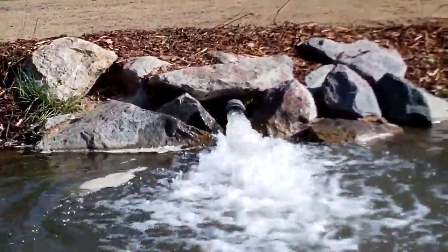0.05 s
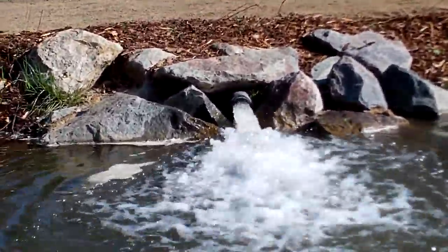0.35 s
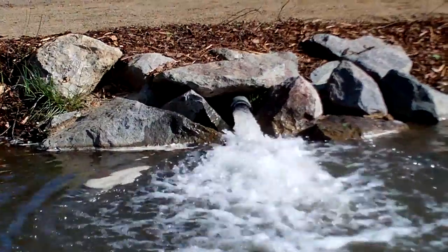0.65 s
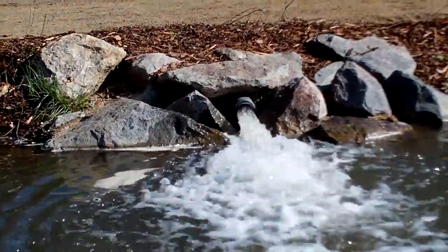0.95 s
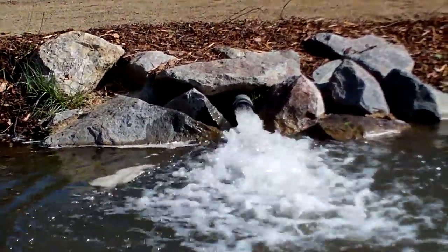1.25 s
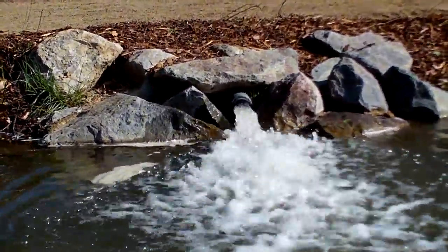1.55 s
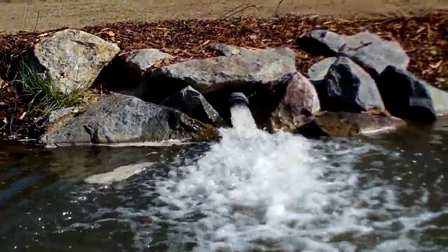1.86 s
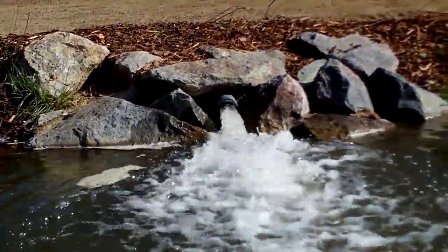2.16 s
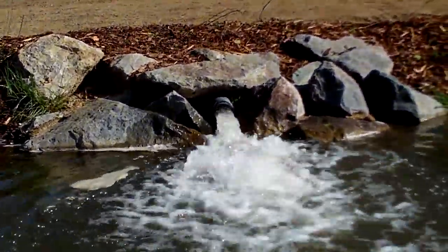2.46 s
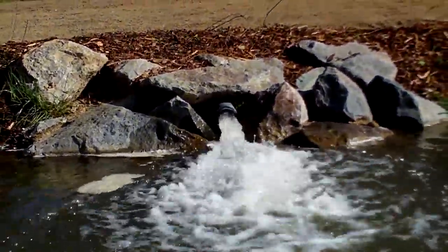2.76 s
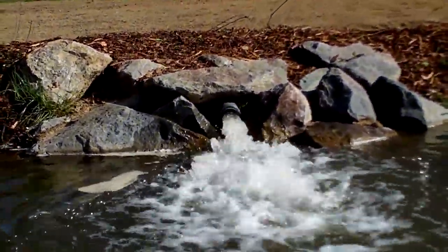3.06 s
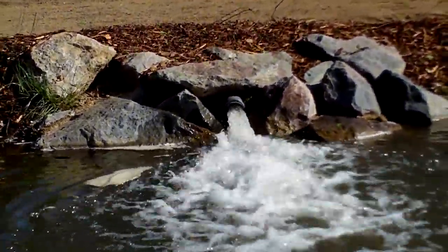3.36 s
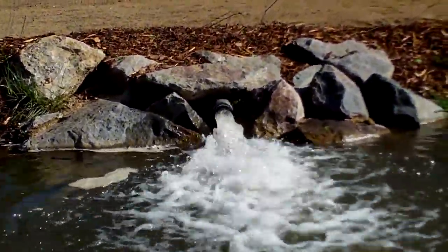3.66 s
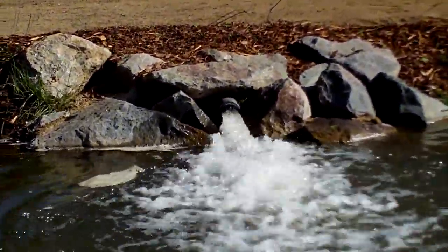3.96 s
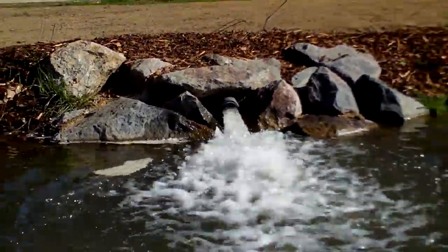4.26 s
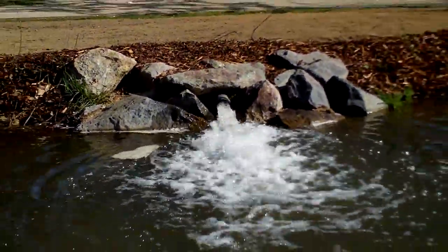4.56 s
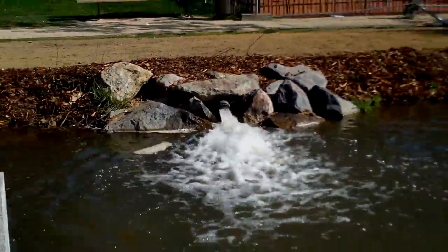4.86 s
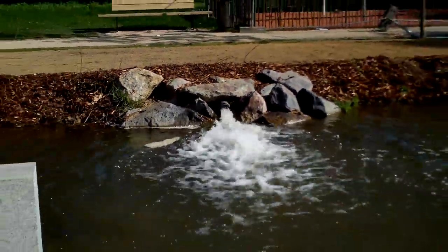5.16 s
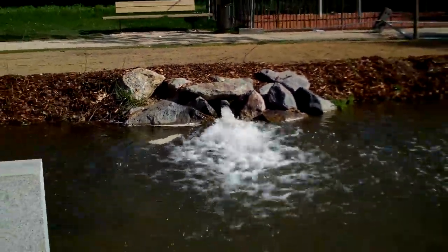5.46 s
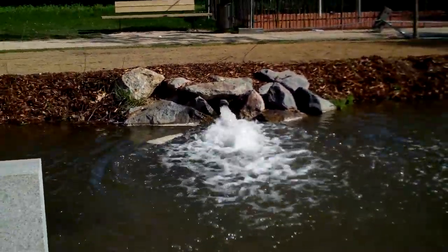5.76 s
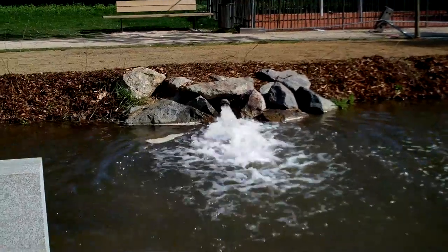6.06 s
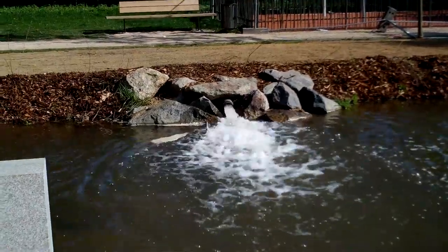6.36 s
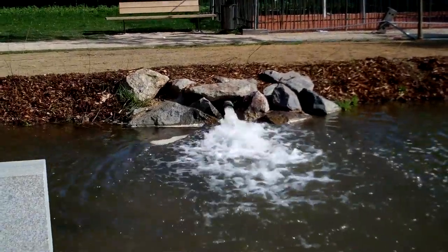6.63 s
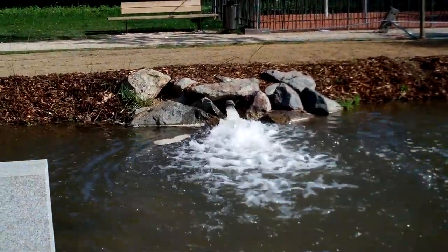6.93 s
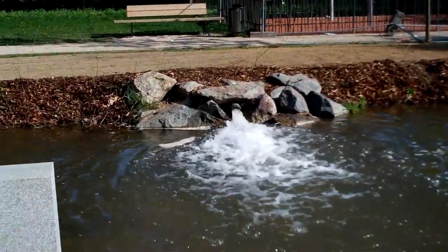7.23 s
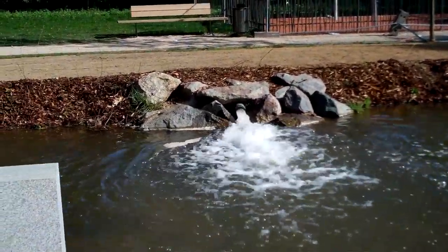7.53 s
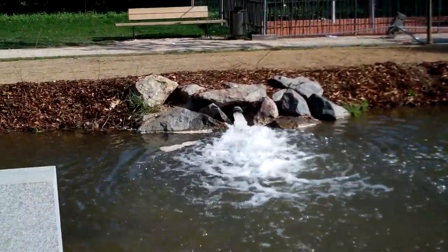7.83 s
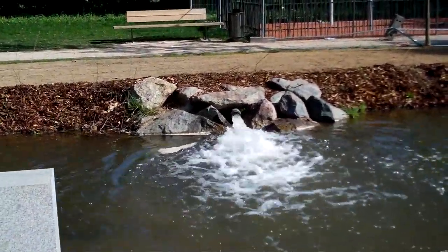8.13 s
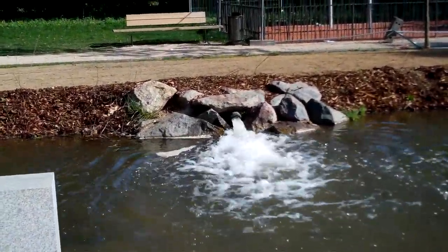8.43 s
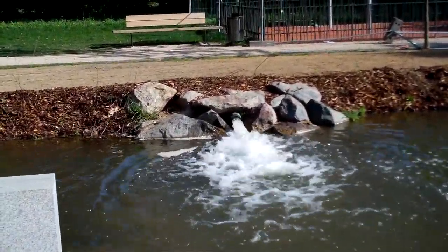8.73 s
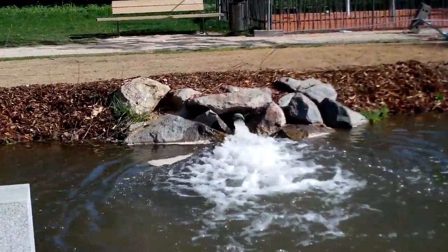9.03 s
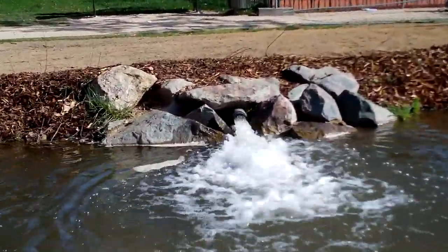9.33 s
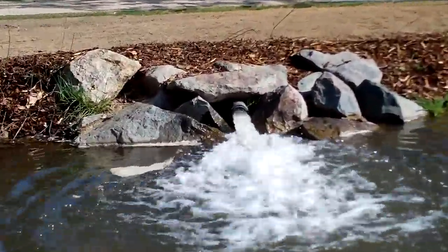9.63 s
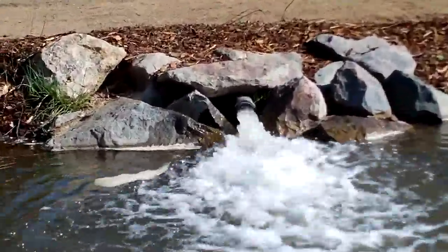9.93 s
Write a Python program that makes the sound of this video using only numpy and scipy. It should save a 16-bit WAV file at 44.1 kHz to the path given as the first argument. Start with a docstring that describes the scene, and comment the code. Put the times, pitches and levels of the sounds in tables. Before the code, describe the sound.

Outdoors on a pond bank, a hand-held camera picks up water pouring from a pipe: continuous bubbling and churning, hollow glugs and pattering spray. Scattered plastic clicks and dull handling bumps sound right at the microphone, while a far bird and a low hum barely show through. After the middle, the casing cracks sharply once; the water turns quieter, then slowly recovers as the ticking goes on.

```python
"""Glugging, gurgling water under splashing spray: a pipe gushes into a park pond and its jet drives
air under, where it rings as bubbles. Up close, the casing of a hand-held camera on the bank ticks,
rubs and bumps in the grip. A far bird and a low hum barely show through. One sharp crack of the
casing makes the gain control duck, and the water creeps back over three seconds."""
import sys
import numpy as np
from scipy import signal
from scipy.fft import rfft, irfft, next_fast_len
from scipy.io import wavfile
from scipy.ndimage import map_coordinates

SR = 44100
rng = np.random.default_rng(int(sys.argv[2]) if len(sys.argv) > 2 else 0)


def store_wav(level_fs):
    """Save 16-bit WAV to argv[1]."""
    pcm = np.round(np.clip(np.atleast_2d(level_fs), -1, 1) * 32767)
    wavfile.write(sys.argv[1], SR, pcm.T.astype(np.int16))


N = 440559
TIME = np.arange(N) / SR


def water():
    """Big bubbles boil up under the jet, small ones babble in the foam, spray patters down in bursts."""
    # tone of the plunging water: f/Hz, relative level/dB
    spectrum = [(25, -55), (70, -29.5), (170, -23), (350, -10.5), (440, -1), (560, -0.5), (730, -5),
                (1500, -7.5), (3100, -10.5), (4400, -24.5), (6100, -25.5), (9300, -32.5), (11800, -43),
                (15000, -64)]
    surge = wobble(rate=14)  # the jet lands unevenly
    churn = rng.standard_normal(N) * amp(0.14 * surge + 0.6 * wobble(rate=60))
    boil = bubbles(count=200, low_hz=425.3, high_hz=590, cycles=41, rise=0.21, spread_db=2, size=4000)
    gurgle = bubbles(count=1300, low_hz=369.2, high_hz=1162, cycles=38, rise=0.082,
                     spread_db=1.5, size=2400)
    babble = bubbles(count=7000, low_hz=908.6, high_hz=5390, cycles=49, rise=0.063,
                     spread_db=2.5, size=700)
    spray = bubbles(count=20000, low_hz=3100, high_hz=14000, cycles=8.6, rise=0.05,
                    spread_db=2, size=120)
    splash = amp(0.5 * surge + 0.44 * wobble(rate=50))
    body = churn + amp(-27) * boil + amp(-20) * gurgle
    foam = splash * (amp(-11.5) * babble + amp(-6.5) * spray)
    coloured = filtered(body + foam, lambda hz: amp(along(spectrum, hz) + port_db(hz)))
    return amp(-37 + 0.03 * wobble(rate=2.27)) * unit(coloured)


def bubbles(count, low_hz, high_hz, cycles, rise, spread_db, size):
    """Ringing bubbles, many weak and a few strong; each bends up in pitch as it nears the surface."""
    when, pitch, strength, damping = rng.random((count, 4)).T[:, :, None]
    hz = low_hz * (high_hz / low_hz) ** pitch
    t = np.arange(size) / SR
    age = t * hz / (cycles * (0.5 + damping))  # 1 = died away
    gain = amp(-spread_db * np.log(1 - 0.98 * strength)) * hz / low_hz
    bend = 1 + rise * np.minimum(age, 1) / 2
    ring = gain * amp(-60 * age) * np.sin(2 * np.pi * hz * t * bend)
    place = (when * N).astype(int) + np.arange(size)
    return unit(np.bincount(place.ravel(), ring.ravel(), N)[:N])


def port_db(hz):
    """The colour that the microphone port gives to the water."""
    # peaks and hollows of the port: f/Hz, width/Hz, level/dB
    resonances = [(724, 47, -1.5), (892, 58, 4), (1244, 60, -3.5), (1540, 110, 1.5), (1684, 72, -2.5),
                  (1884, 78, 3), (2090, 96, -1.5), (2320, 130, 2.5), (2573, 160, -3.5), (3350, 82, -1),
                  (3984, 65, 5), (6880, 410, -9), (8150, 440, -1.5)]
    return sum(db * np.exp(-((hz - centre) / width) ** 2) for centre, width, db in resonances)


def glugs():
    """A big pocket of air swells in, rings for some cycles and rises a little in pitch."""
    # the biggest pockets of air: t/s, peak level/dB, f/Hz, swell/s
    pockets = [(.088, -32, 450, 0.0062), (.15, -36, 500, .008), (.81, -39, 483, .0065),
               (.91, -38, 535, .007), (1.125, -34, 595, .0064), (1.2, -35.5, 552, .0066),
               (1.43, -38, 466, 0.017), (1.5, -37.5, 460, .008), (1.89, -38, 467, .008),
               (2.35, -35, 466, 0.013), (2.513, -35, 448, 0.0094), (2.692, -36, 445, 0.005),
               (3.24, -34.5, 580, .007), (3.813, -33, 448, .0063), (4.565, -38, 540, 0.0043),
               (4.975, -34, 455, 0.0085), (5.244, -30.5, 467, 0.0044), (5.44, -37, 456, .007),
               (5.648, -36, 537, .005), (6.115, -32.5, 518, .01), (6.285, -36, 492, 0.0076),
               (6.933, -24.5, 490, .003), (8.43, -39, 538, 0.005), (8.764, -45, 458, .006),
               (9.402, -34, 530, .005), (9.645, -37, 466, 0.0054), (9.881, -35, 565, .006)]
    track, t = np.zeros(N), np.arange(SR // 8) / SR
    for s, db, hz, swell in pockets:
        age = t / swell  # 1 = loudest
        envelope = amp(db) * age * np.exp(1 - age)
        add(track, s, envelope * np.sin(2 * np.pi * hz * t * (1 + 0.0072 * age)))
    return track


def casing():
    """The shell of the camera ticks in the grip, and fingers rub across it."""
    # ticks of the shell: t/s, level/dB, ring f/Hz, ring t60/s, contact hardness/0-1
    ticks = [(0.3577, -23.5, 1860, .005, 0.52), (1.2456, -22, 1600, .0076, 0.26),
             (1.3945, -28, 1600, .005, .2), (1.554, -25.5, 1300, .0045, 0),
             (1.6736, -23, 1410, 0.0046, .06), (2.1772, -15, 1630, 0.0099, 0.54),
             (2.1805, -16.5, 1360, 0.012, .53), (3.0026, -17.5, 1720, 0.0069, 0.61),
             (3.7906, -31, 1560, .005, 1), (3.9069, -19, 1780, 0.0066, 0.46),
             (4.1522, -24.5, 1710, .007, .2), (4.7971, -28, 2250, .007, .2), (4.828, -27, 2000, .007, 0),
             (5.3596, -27, 1450, .005, 0), (5.757, -24, 1570, .009, 0), (5.769, -21.5, 1350, .004, .1),
             (5.812, -28, 1700, .007, .4), (5.816, -26, 1650, .009, .2), (5.8213, -18, 1320, 0.011, 0.61),
             (5.8243, -17, 1600, .012, 0.4), (5.8296, -14, 1790, .011, 0.65),
             (5.8314, -22, 1390, .0059, 0.99), (5.8324, -7.5, 1120, 0.004, 0.4),
             (5.833, -15.5, 1600, 0.018, 0.7), (7.302, -20.5, 1540, .008, 0),
             (7.561, -22.5, 1700, .007, .05), (7.712, -27, 1450, .005, 0), (7.849, -28, 1500, .005, .05),
             (7.934, -23.5, 1570, .008, .05), (7.999, -14.5, 1540, .011, 0),
             (8.1981, -38, 1350, .005, 0.94), (8.708, -23.5, 1460, 0.0055, 0),
             (8.9672, -27, 1450, .003, .15), (9.0255, -20, 1560, .013, .43), (9.0395, -29, 1600, .008, .1),
             (9.3541, -26, 2350, .006, .1), (9.9159, -16, 1460, .0037, 0.23)]
    # finger strokes: t/s, length/s, rms level/dB
    strokes = [(1.246, 0.13, -45), (5.787, 0.057, -40.5), (9.005, .095, -42)]
    track = np.zeros(N)
    for s, db, hz, t60, hardness in ticks:
        add(track, s, amp(db) * tick(hz, t60, hardness))
    for s, length, db in strokes:
        add(track, s, amp(db) * rub(length))
    # the small shell passes no bass and little top
    shell_band = signal.butter(3, [350, 12500], "band", fs=SR, output="sos")
    hollow_hz, width_hz = 7050, 470  # the port's deepest hollow also colours the ticks
    hollow = signal.iirnotch(hollow_hz, hollow_hz / width_hz, fs=SR)
    return signal.lfilter(*hollow, signal.sosfilt(shell_band, track))


def tick(hz, t60, hardness):
    """Stiff plastic slips and the finger-damped shell knocks; hard contacts crack and wake high modes."""
    # higher modes of the shell: f/Hz, level at the hardest contact/dB, t60/s
    shell_modes = [(3040, -4, .007), (3620, -.5, 0.0067), (4116, 1.5, 0.0082), (4920, -2, 0.0064),
                   (6060, -8.5, 0.006), (8370, 2.5, .0042), (11000, -5.5, .004)]
    t = np.arange(SR // 25) / SR
    knock = amp(-1.5) * mode(t, hz, t60)
    db_per_octave = 23.5 * (1 - hardness)  # a soft contact loses the highs
    detunes = 1 + 0.036 * rng.uniform(-1.1, 1, len(shell_modes))
    clack = sum(amp(db - db_per_octave * np.log2(f / 1720)) * mode(t, f * detune, decay)
                for (f, db, decay), detune in zip(shell_modes, detunes))
    crack = burst(t, low_hz=1720, high_hz=2610 + 3000 * hardness, t60=0.0089)
    return knock + clack + amp(-18.5 + 20 * hardness) * crack


def mode(t, hz, t60, attack_s=0.00029):
    """One quickly dying mode, with the energy of a millisecond at rms 1."""
    ring = np.sin(2 * np.pi * hz * t) * amp(-60 * t / t60) * (1 - np.exp(-t / attack_s))
    return ring * np.sqrt(SR / 1000 / np.sum(ring ** 2))


def burst(t, low_hz, high_hz, t60):
    """A dying puff of noise in one band, with the energy of a millisecond at rms 1."""
    band = signal.butter(3, [low_hz, high_hz], "band", fs=SR, output="sos")
    puff = signal.sosfilt(band, rng.standard_normal(len(t)) * amp(-60 * t / t60))
    return puff * np.sqrt(SR / 1000 / np.sum(puff ** 2))


def rub(length_s, slips_per_s=2500):
    """A finger drags over the shell in tiny slips."""
    progress = np.linspace(0, 1, int(length_s * SR))
    stroke = np.sqrt(progress) * (1 - progress)  # catches quickly, lets go slowly
    slips = rng.standard_normal(len(stroke)) * (rng.random(len(stroke)) < slips_per_s / SR)
    band = signal.butter(2, [1300, 3000], "band", fs=SR, output="sos")
    return unit(signal.sosfilt(band, stroke * slips))


def hand(bump_hz=200, bump_t60=0.026, bump_attack_s=0.0013):
    """A lumpy rumble that swells when the grip shifts, and dull bumps of a few heavily damped cycles."""
    # shifts of the grip: middle t/s, half length/s, rumble level/dB
    regrips = [(1.1, .2, -66), (3.5, 0.34, -64), (4.5, .25, -67.5), (7.35, 0.46, -62), (9.7, 0.52, -63.5)]
    # soft bumps of the hand: t/s, level/dB
    bumps = [(1.03, -42), (1.081, -33), (3.26, -41), (3.4, -37), (3.548, -33), (4.069, -37.5), (7.39, -38),
             (8.487, -38), (8.551, -34), (9.022, -30.5), (9.488, -34), (9.87, -33), (9.905, -28)]
    band = signal.butter(3, [95, 290], "band", fs=SR, output="sos")
    lumps = unit(signal.sosfilt(band, rng.standard_normal(N)) * amp(3.6 * wobble(rate=22)))
    resting = amp(-71.5)
    shifting = sum(amp(db) * np.exp(-((TIME - s) / half) ** 2) for s, half, db in regrips)
    track, t = lumps * (resting + shifting), np.arange(SR // 8) / SR
    envelope = amp(-60 * t / bump_t60) * (1 - np.exp(-t / bump_attack_s))
    thud = envelope * np.sin(2 * np.pi * bump_hz * t)
    for s, db in bumps:
        add(track, s, amp(db) * thud)
    return signal.sosfilt(signal.butter(2, 70, "high", fs=SR, output="sos"), track)


def bird(note_s=0.053, fall=0.108, flutter_hz=90):
    """A far bird calls in thin, fluttering whistles that fall in pitch."""
    # the bird's notes: t/s, peak level/dB, starting f/Hz
    notes = [(3.93, -55, 7100), (4.397, -52, 5100), (4.48, -50, 5050), (4.67, -53, 5040)]
    track, t = np.zeros(N), np.arange(int(note_s * SR)) / SR
    flutter = 1 + 0.035 * np.sin(2 * np.pi * flutter_hz * t)
    glide = np.linspace(1, 1 - fall, len(t)) * flutter
    for s, db, hz in notes:
        whistle = np.sin(2 * np.pi * np.cumsum(hz * glide) / SR)
        add(track, s, amp(db) * np.hanning(len(t)) * whistle)
    return track


def hum(hz=51, rms_db=-80):
    """A faint, slightly unsteady low hum."""
    peak = np.sqrt(2) * amp(rms_db + wobble(rate=2.8))
    return peak * np.sin(2 * np.pi * hz * TIME + 0.4 * wobble(rate=5))


def gain_control(x, threshold_db, depth_db, recover_db_per_s, attack_s):
    """A loud peak ducks the gain by at most depth_db; it then climbs steadily back."""
    power = signal.lfilter(np.ones(220) / 220, 1, x ** 2)  # 5 ms window
    level_db = 10 * np.log10(np.abs(power) + 1e-12)
    cut_db = np.clip(10 * (level_db - threshold_db), 0, depth_db)
    climb_db = recover_db_per_s * TIME
    held_db = np.maximum.accumulate(cut_db + climb_db) - climb_db
    step = 1 - np.exp(-1 / (attack_s * SR))
    return x * amp(-signal.lfilter([step], [1, step - 1], held_db))


def amp(db):
    """Decibels to gain."""
    return 10 ** (np.asarray(db) / 20)


def unit(x):
    """Scaled to rms 1."""
    return x / np.sqrt(np.mean(x ** 2) + 1e-20)


def along(points, hz):
    """A curve through (f/Hz, value) points, read on a log frequency axis."""
    f, value = np.transpose(points)
    return np.interp(np.log(hz + 1), np.log(f + 1), value)


def wobble(rate):
    """A smooth random curve, rate knots a second."""
    return map_coordinates(rng.standard_normal(int(N * rate / SR) + 4), [TIME * rate])


def filtered(x, response):
    """Equalise x with a gain given as a function of frequency."""
    size = next_fast_len(N + SR // 2)
    return irfft(rfft(x, size) * response(np.fft.rfftfreq(size, 1 / SR)), size)[:N]


def add(track, s, sound):
    """Mix a sound into the track at time s."""
    part = track[max(round(s * SR), 0):][:len(sound)]
    part += sound[:len(part)]


def scene():
    """The pond, the handling noise and the faint background, in mono."""
    return (water() + glugs() + casing() + hand() + bird() + hum())[None]


def record(dry, top_hz=15000):
    """The camera's gain control and steep high cut."""
    ducked = gain_control(dry[0], threshold_db=-18.5, depth_db=6, recover_db_per_s=2, attack_s=0.003)
    return filtered(ducked, lambda hz: 1 / np.sqrt(1 + (hz / top_hz) ** 120))[None]


dry = scene()
out = record(dry)
store_wav(out)
```